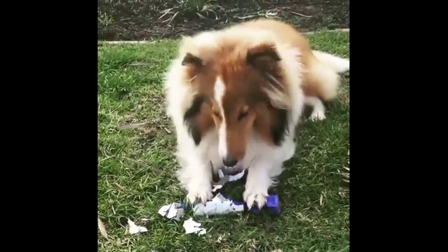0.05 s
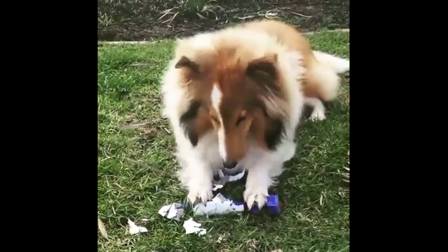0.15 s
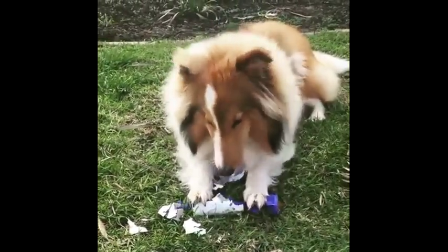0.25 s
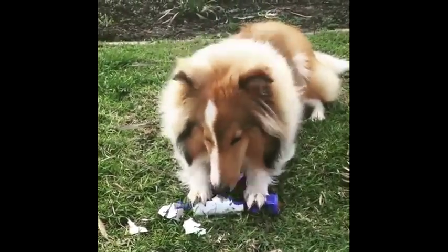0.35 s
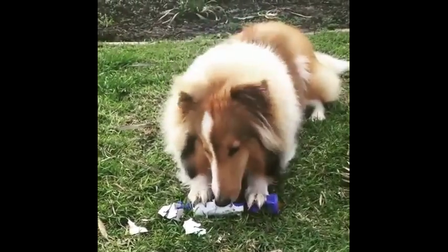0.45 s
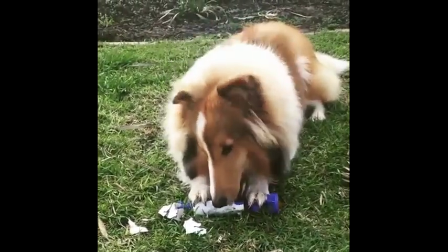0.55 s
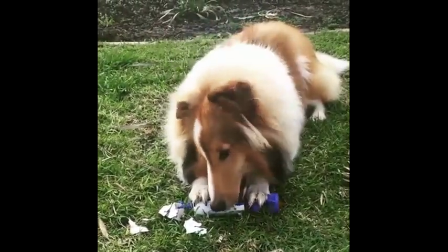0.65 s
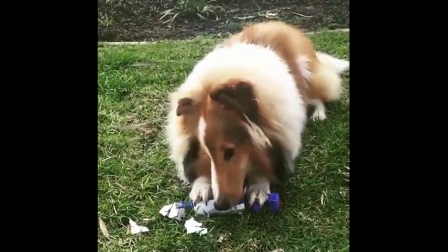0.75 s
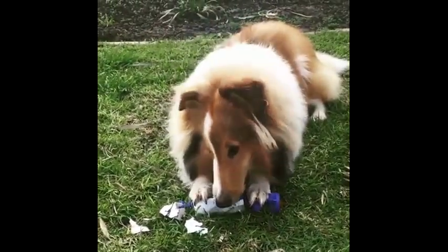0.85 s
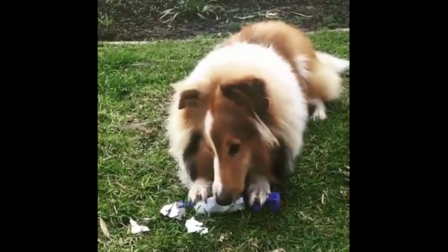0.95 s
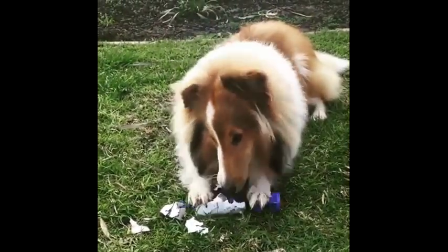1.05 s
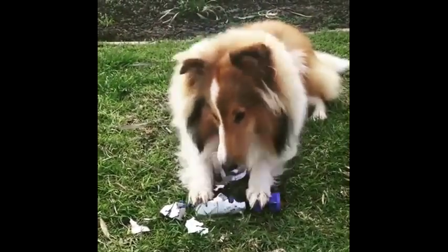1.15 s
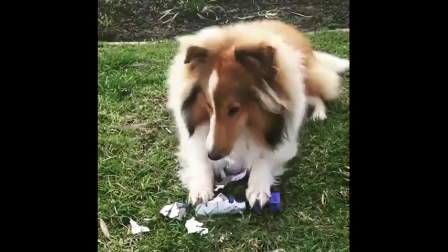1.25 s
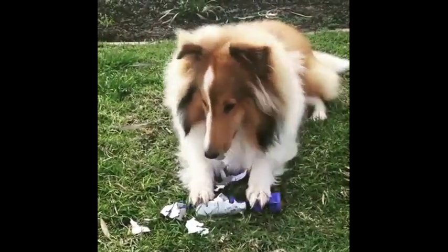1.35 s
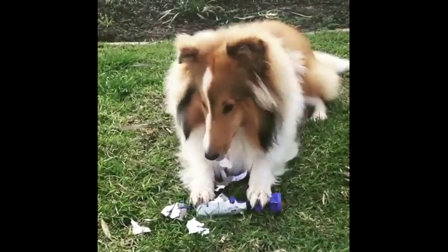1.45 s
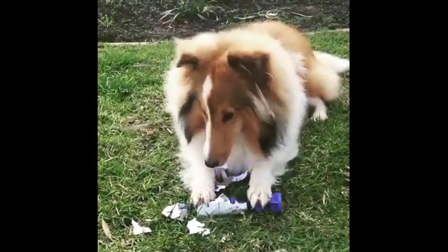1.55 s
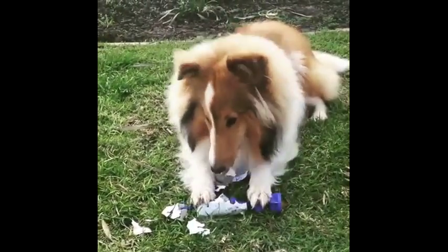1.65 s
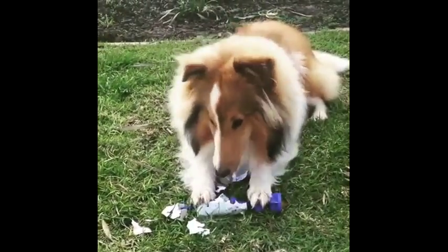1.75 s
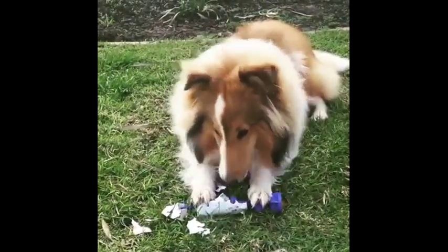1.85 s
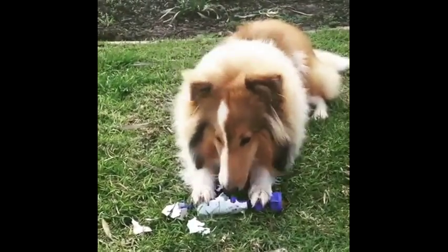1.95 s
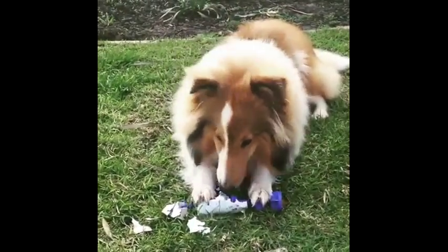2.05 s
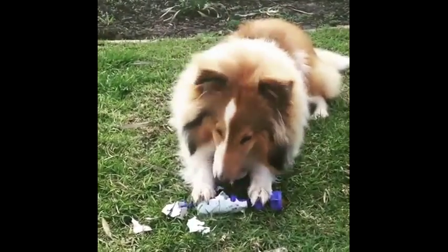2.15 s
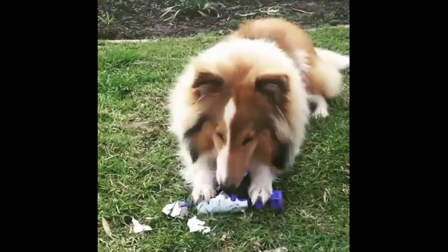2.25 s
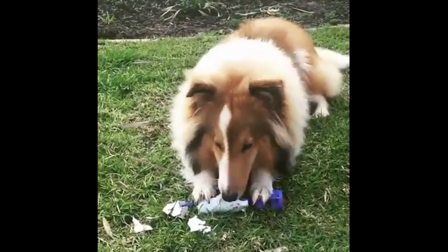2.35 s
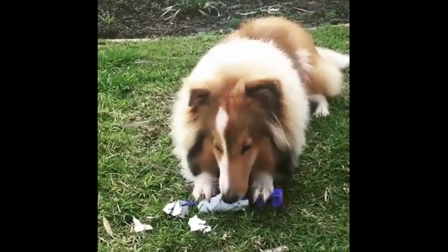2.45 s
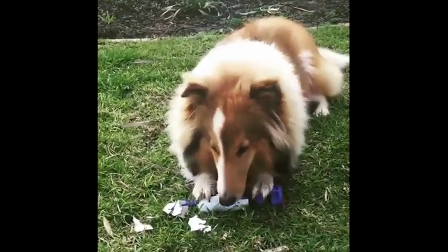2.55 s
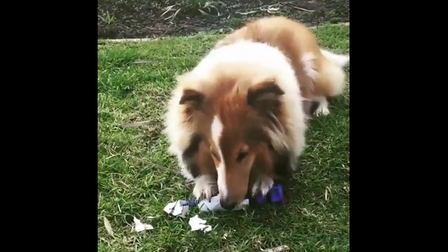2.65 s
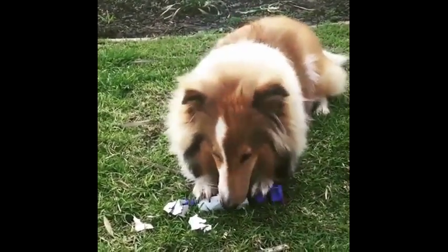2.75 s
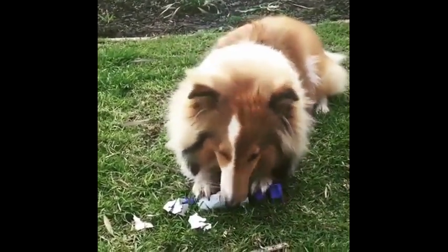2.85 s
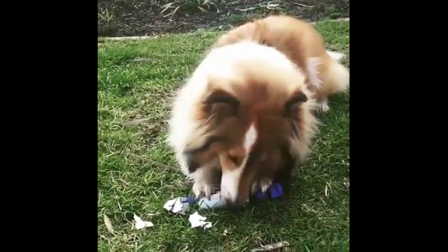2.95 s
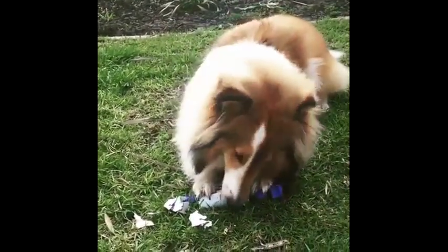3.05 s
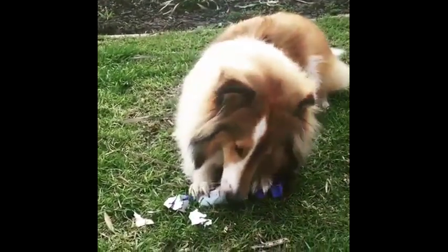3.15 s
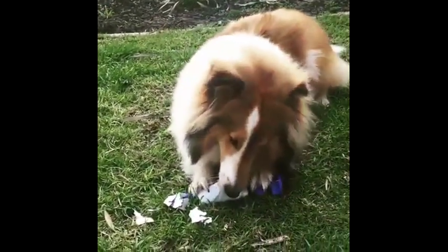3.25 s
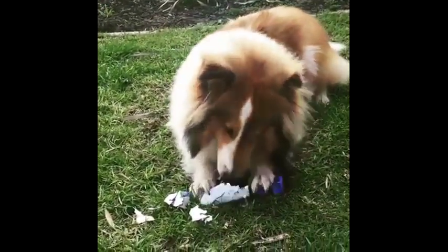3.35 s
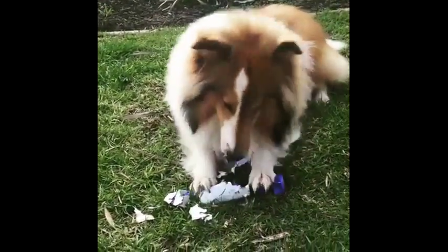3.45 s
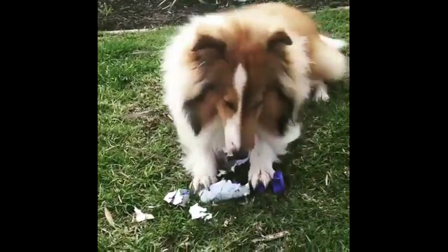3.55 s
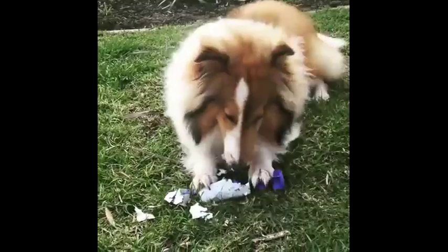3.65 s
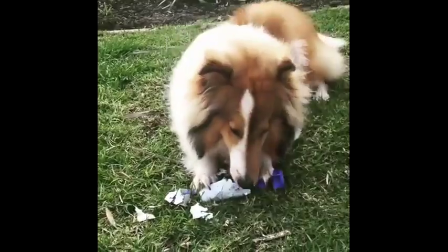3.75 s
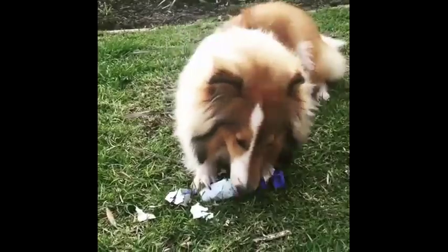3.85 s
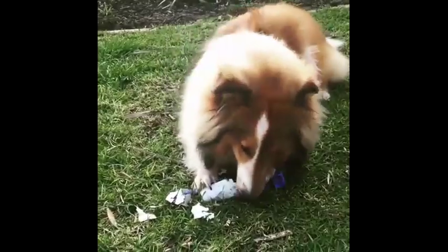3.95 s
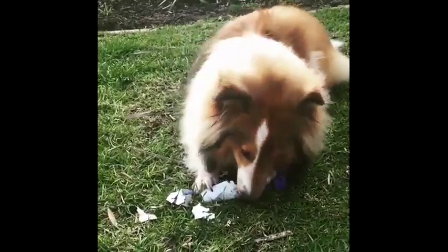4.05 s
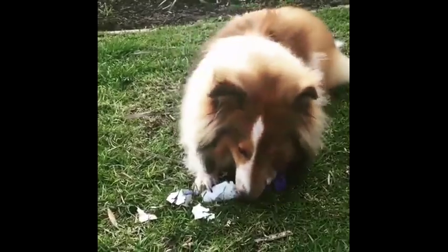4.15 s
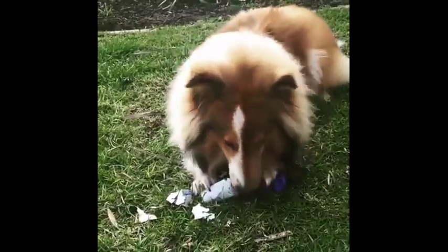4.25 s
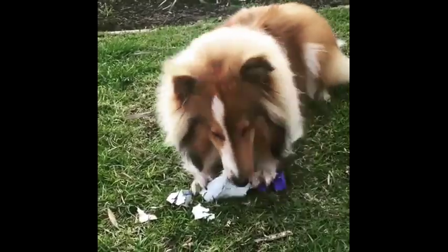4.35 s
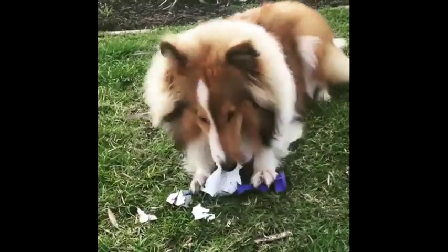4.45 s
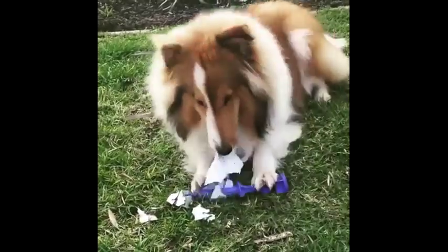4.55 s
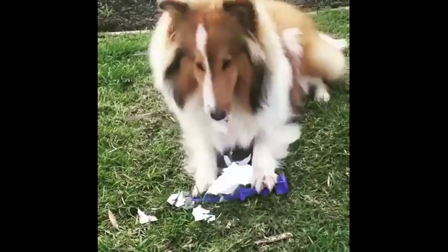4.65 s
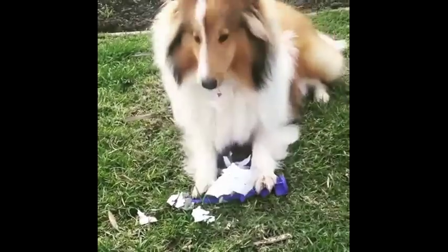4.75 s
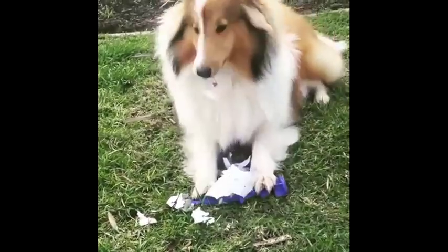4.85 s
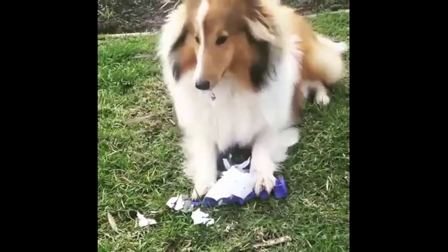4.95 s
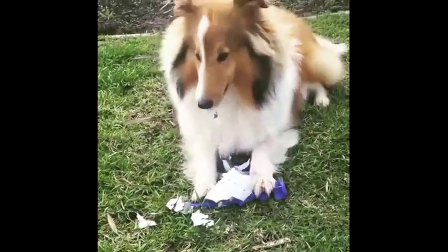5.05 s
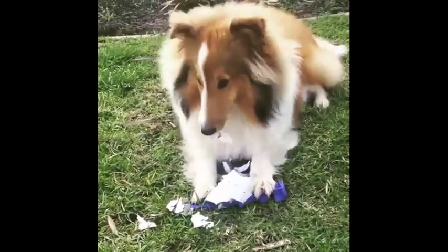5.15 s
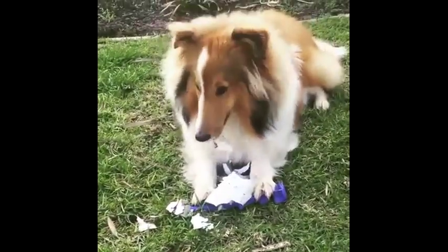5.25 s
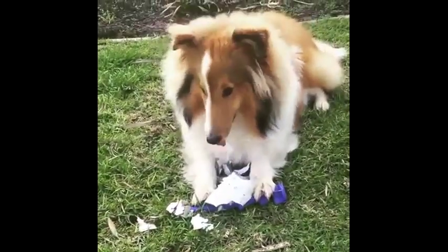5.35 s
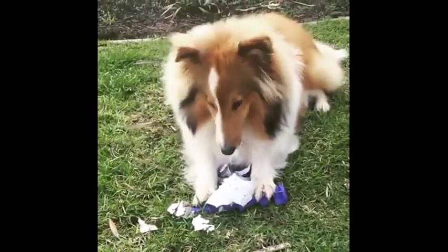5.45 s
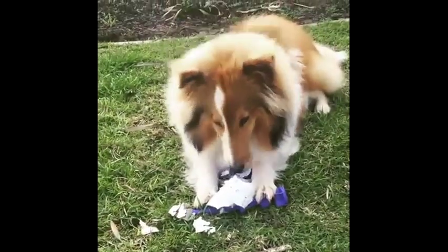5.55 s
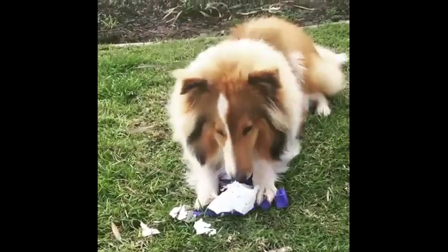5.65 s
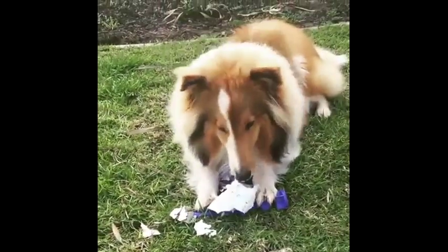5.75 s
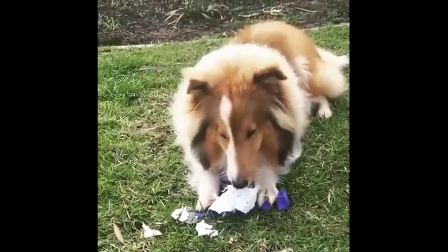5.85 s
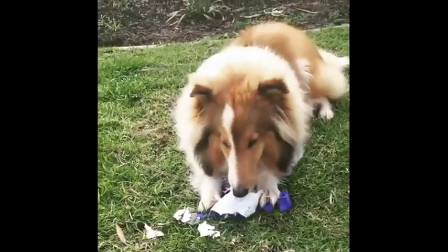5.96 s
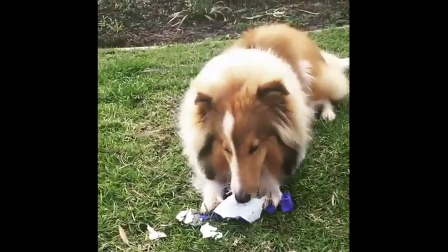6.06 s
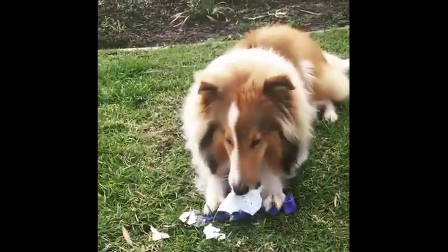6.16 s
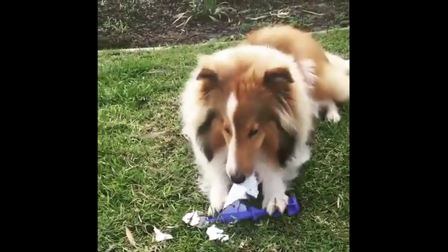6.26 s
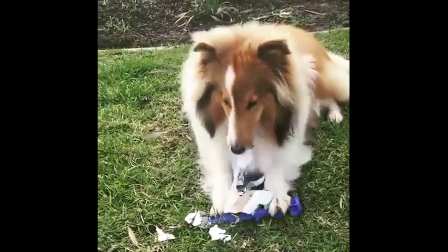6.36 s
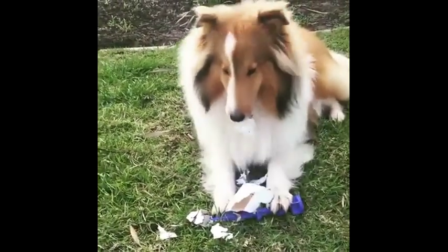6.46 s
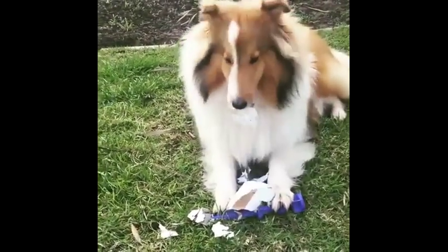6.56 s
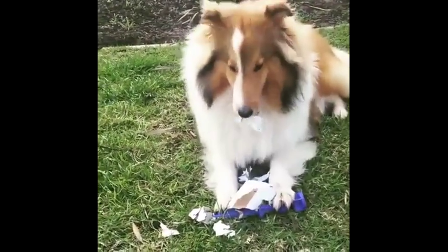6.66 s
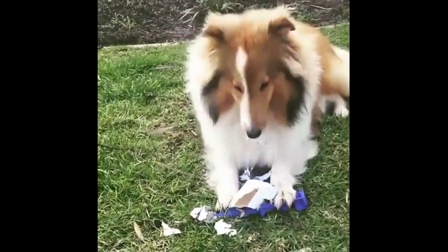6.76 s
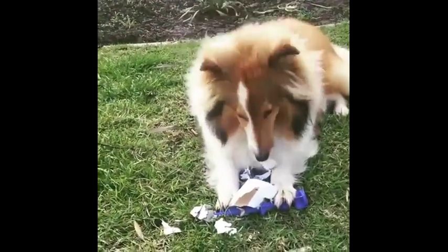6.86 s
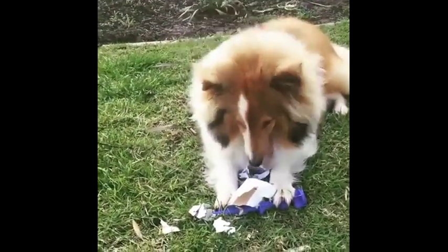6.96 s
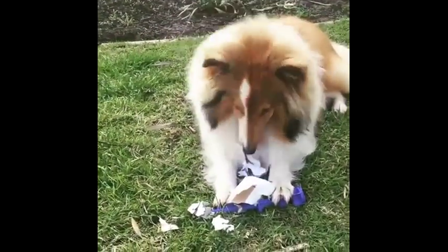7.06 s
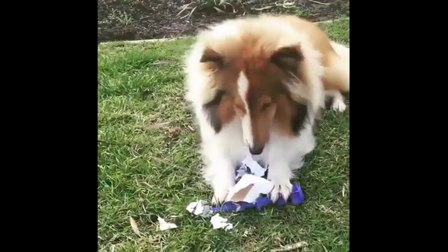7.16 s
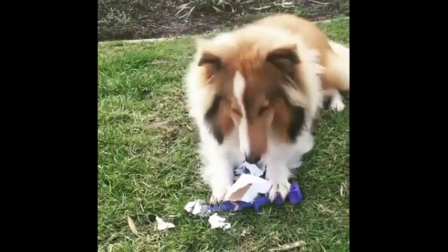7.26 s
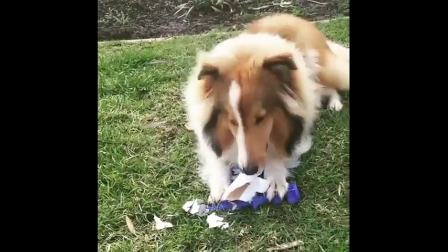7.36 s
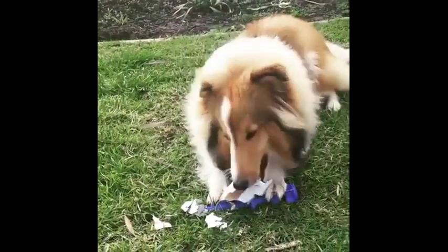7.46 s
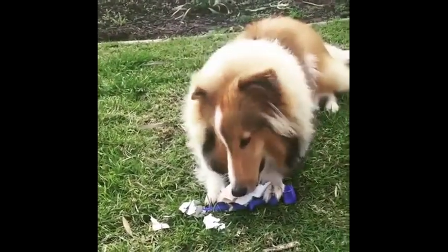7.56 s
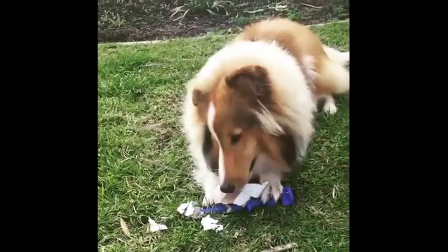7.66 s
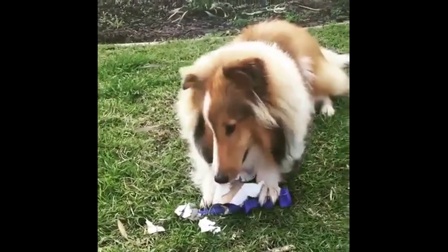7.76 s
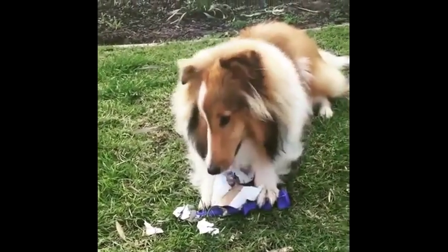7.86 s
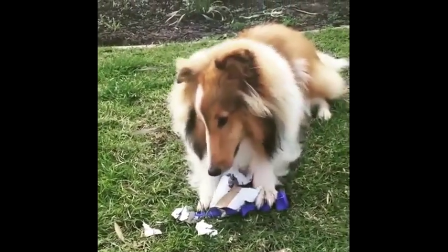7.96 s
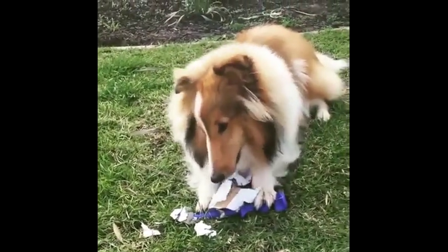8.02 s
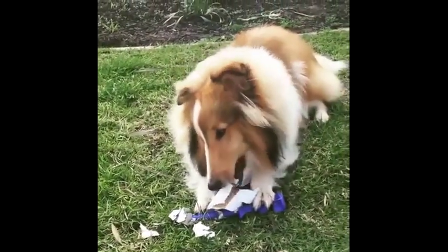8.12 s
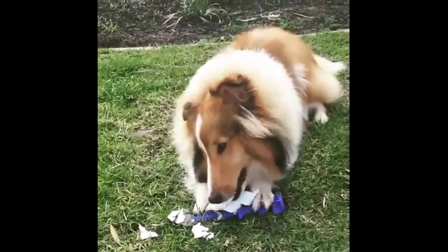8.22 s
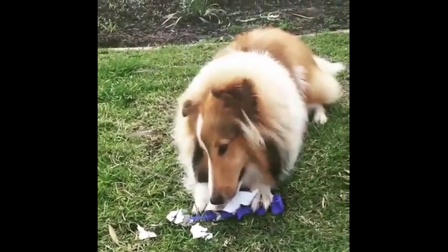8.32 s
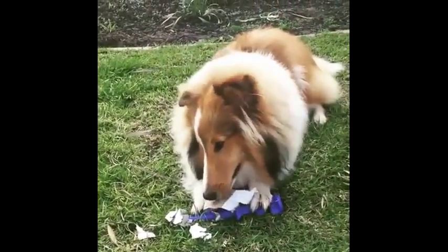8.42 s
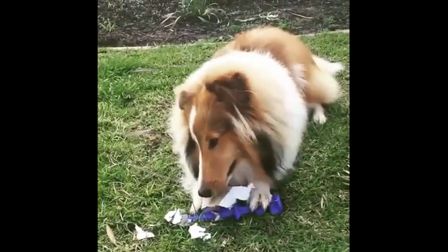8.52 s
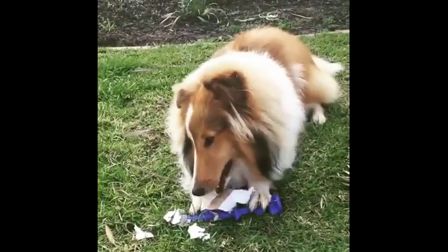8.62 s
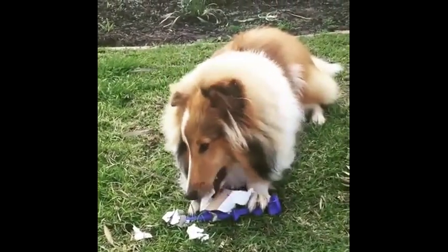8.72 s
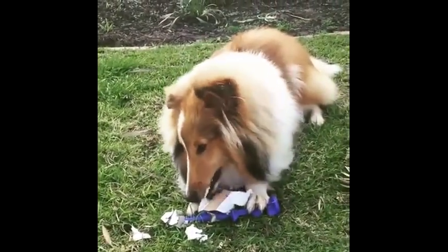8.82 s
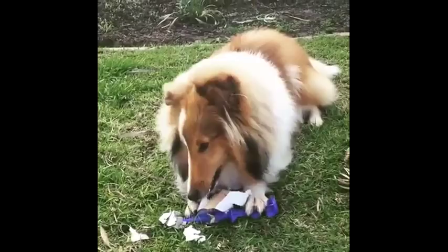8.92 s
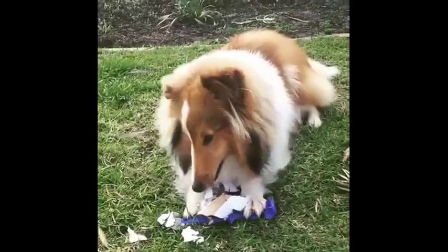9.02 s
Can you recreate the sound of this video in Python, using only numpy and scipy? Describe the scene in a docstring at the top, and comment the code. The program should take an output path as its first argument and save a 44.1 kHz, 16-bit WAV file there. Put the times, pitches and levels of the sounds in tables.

```python
"""Wrapping paper, pulled apart by a dog's teeth on a lawn, two metres from a phone.
Creases flip and ring the sheet; fibres rip in short bursts, one per pull of the jaws.
Far off, a songbird carols in fluty and hoarse notes, echoed by trees and fences.
Background: traffic rumble, soft hiss, a droning motor."""
import sys
import numpy as np
from scipy import signal
from scipy.fft import rfft, irfft, next_fast_len
from scipy.io import wavfile
from scipy.ndimage import uniform_filter1d

SR = 44100
rng = np.random.default_rng(int(sys.argv[2]) if len(sys.argv) > 2 else 0)


def master_out(mix):
    """Clip the mix to full scale and print it as 16-bit PCM to the path in sys.argv[1]."""
    frames = np.transpose(np.atleast_2d(mix))
    ceiling = np.clip(frames, -1, 1)
    pcm = np.round(ceiling * 32767).astype(np.int16)
    wavfile.write(sys.argv[1], SR, pcm)


N = 400816

# crease snaps: t/s, ring f/Hz, ring peak/dB, treble crack peak/dB
CREASE_SNAPS = [(0.0215, 3200, -27, -26), (0.327, 2440, -48, -75), (0.681, 1170, -49, -58),
                (0.683, 2320, -50.5, -51), (2.278, 2730, -43.5, -65), (2.66, 1280, -47.5, -77),
                (2.732, 2700, -52, -51), (2.976, 2200, -35.5, -20), (2.9935, 1700, -33, -32.5),
                (3.311, 2030, -40, -34), (3.339, 1690, -27, -38), (3.524, 1120, -24, -27.5),
                (3.925, 3600, -47, -53), (3.995, 3200, -39, -40), (4.438, 2070, -54, -39),
                (4.538, 1490, -24, -51), (4.592, 925, -42.5, -55), (4.729, 5030, -20.5, -16),
                (4.806, 6250, -25, -25.5), (5.467, 1670, -41, -70), (6.387, 2400, -48, -28),
                (6.902, 5500, -55, -53), (7.908, 3240, -43.5, -43), (7.93, 3480, -45, -51),
                (7.949, 4160, -32.5, -54), (7.956, 730, -53.5, -60), (7.994, 4400, -34, -27.5),
                (8.029, 4660, -38.5, -34), (8.431, 1390, -55, -61), (8.677, 2870, -52, -58),
                (8.722, 3240, -56.5, -66), (8.817, 3200, -48, -52.5), (8.878, 2470, -47, -56),
                (8.887, 2360, -43, -52), (8.899, 3030, -35.5, -55), (8.915, 4700, -38.5, -39)]
# rip envelopes, one list per pull of the jaws: t/s, level/dB
JAW_PULLS = [
    [(0, -50.5), (.012, -60), (.022, -37), (.028, -42), (.034, -57), (.06, -82)],
    [(.9, -76.5), (1.04, -67), (1.072, -60), (1.11, -73.5), (1.155, -56), (1.184, -50), (1.189, -42),
     (1.204, -42.5), (1.21, -58), (1.235, -73)],
    [(2.975, -59), (3.035, -80)],
    [(3.29, -84), (3.33, -69), (3.45, -65.5), (3.51, -75)],
    [(3.51, -62), (3.521, -49.5), (3.526, -36.5), (3.54, -49), (3.545, -64), (3.59, -72)],
    [(4.36, -69), (4.5, -68), (4.525, -53), (4.536, -42), (4.58, -47.5), (4.624, -52.5), (4.65, -44.5),
     (4.705, -54)],
    [(4.705, -48), (4.72, -44.5), (4.727, -33), (4.732, -29), (4.735, -53), (4.748, -50), (4.751, -38),
     (4.756, -38), (4.759, -44), (4.764, -32.5), (4.773, -41.5), (4.783, -42.5), (4.806, -43.5),
     (4.812, -58), (4.85, -64.5)],
    [(6.1, -76), (6.3, -70), (6.35, -60), (6.372, -52.5), (6.378, -68), (6.41, -53)],
    [(6.41, -65), (6.428, -42), (6.446, -47), (6.45, -37.5), (6.482, -37), (6.515, -44.5), (6.558, -52.5),
     (6.568, -72)],
    [(7.73, -73), (7.778, -58), (7.81, -61.5), (7.835, -77)],
    [(7.885, -70), (7.94, -52), (7.95, -43), (7.975, -58), (7.995, -50.5), (8.028, -57), (8.04, -53.5),
     (8.1, -82)],
    [(8.41, -79), (8.43, -57.5), (8.45, -71), (8.465, -64), (8.522, -55), (8.545, -56.5), (8.61, -77.5)],
    [(8.705, -83), (8.73, -66), (8.785, -80), (8.85, -75), (8.9, -75), (8.95, -72.5), (9.09, -70)],
]
# sheet thud, one per pull: level/dB re rip
THUD_GAINS_DB = [5, -3, 8, 0.5, 4.5, -7, -14, -5, -11.5, -24, -11, -33, -7]
# tearing paper spectrum: f/Hz, level/dB
RIP_SPECTRUM = [(1100, -14.5), (2000, -3), (2700, -1.5), (3400, 2), (4900, -1), (6400, 3.5), (8500, -1.5),
                (12000, -0.5), (14000, -16)]
# clear bird notes: t/s, length/s, f/Hz, level/dB
CLEAR_NOTES = [(3.765, 0.091, 791, -66.5), (4.076, 0.082, 1073, -54), (4.14, .11, 1194, -68.5),
               (4.165, 0.1, 1058, -58), (4.29, 0.15, 893, -65), (4.718, 0.11, 754, -53),
               (4.923, 0.044, 1460, -56), (5.164, 0.24, 1569, -54), (5.324, 0.24, 1565, -61.5),
               (5.56, 0.23, 1975, -68.5), (6.09, 0.11, 1197, -62.5), (6.596, 0.29, 2800, -73.5),
               (6.869, 0.145, 1304, -63.5), (7.214, 0.092, 1805, -68.5), (8.01, 0.11, 1170, -64.5),
               (8.131, 0.067, 1531, -61.5), (8.21, 0.1, 1446, -55.5), (8.359, .1, 1401, -64.5),
               (8.348, 0.071, 1297, -62)]
# hoarse bird notes: t/s, length/s, f/Hz, level/dB, throb f/Hz, throb depth/dB
HOARSE_NOTES = [(2.406, 0.16, 1433, -73, 60.5, 7.5), (2.43, 0.1, 2070, -71.5, 70.6, 7),
                (4.267, 0.091, 1036, -54, 70, 4.5), (4.361, .075, 1020, -58, 70, 3.5),
                (4.921, 0.15, 1230, -59, 76, 7), (5.001, 0.64, 2386, -76.5, 119.5, 8.5),
                (5.01, 0.093, 1713, -56.5, 66.3, 7), (5.382, 0.315, 1188, -52.5, 88.2, 4),
                (5.652, 0.11, 709, -60, 82, 4.5), (5.76, 0.4, 1003, -55, 56.2, 8.5),
                (8.198, 0.13, 1354, -66.5, 47.5, 5), (8.928, 0.16, 1640, -65.5, 56, 5.5)]
# traffic spectrum: f/Hz, level/dB
TRAFFIC_SPECTRUM = [(25, -22), (38, -8.5), (79, -2), (194, -17), (239, -21.5), (280, -21.5), (426, -34.5),
                    (615, -29), (1180, -30.5), (1500, -34), (2970, -41.5), (11600, -49), (13200, -56.5)]
# higher motor orders: f/Hz, width/Hz, rms level/dB
MOTOR_ORDERS = [(78, 11, -62.5), (110, 14, -65.5)]


def crease_snaps(rise_s=.0004, decay_s=.0011, knock_db_per_octave=-22.5):
    """A crease flips: the jolt rings the bent sheet, cracks in the treble, knocks the card inside."""
    out, t = np.zeros(N), np.arange(-256, 768) / SR
    falloff = abs(t) / np.where(t < 0, rise_s, decay_s)  # for a 2 kHz fold
    for start_s, hz, ring_db, crack_db in CREASE_SNAPS:
        push = np.exp(-falloff * (hz / 2000) ** .32)  # tighter folds flip faster
        jolt = rng.standard_normal(len(t)) * push
        spread = max(1.367 + .016 * (ring_db + 40), 1.05)  # harder snap, wider band
        ring = band(band(jolt, hz / spread, hz * spread), hz / spread, hz * spread)
        crack = band(band(jolt * push, 5660, 12300), 5660, 12300)
        knock = band(jolt, 226, 764)
        knock_db = ring_db + 3 + knock_db_per_octave * np.log2(hz / 1000)  # wide folds knock harder
        for part, db in (ring, ring_db), (crack, crack_db), (knock, knock_db):
            add(out, start_s + t[0], undb(db) * part / abs(part).max())
    return out


def fibre_rips():
    """Thousands of fibres break per second, in uneven slips; the sheet thuds with them."""
    rip_env, thud_env, t = np.zeros(N), np.zeros(N), np.arange(N) / SR
    for pull, thud_db in zip(JAW_PULLS, THUD_GAINS_DB):
        times_s, db = np.transpose(pull)
        force = undb(np.interp(t, times_s, db, left=-200, right=-200))
        rip_env += force
        thud_env += undb(thud_db) * force
    for start_s, _, ring_db, crack_db in CREASE_SNAPS:  # sheet loads up to each snap, then settles
        crinkle_db = min(max(ring_db, crack_db), -42) - 25
        add(rip_env, start_s - .02, undb(crinkle_db) * swell(.051, rise=.31, edge=3.4))
    fibres = rng.standard_normal(N) * undb(2.6 * rng.exponential(size=N))
    fibres *= undb(2.3 * walk(900))
    # folds differ in stiffness: colour shifts from slip to slip
    rasp = wander_bands(colour(fibres, RIP_SPECTRUM), 1024, lambda hz: 2.5 * walk(450))
    thud = band(fibres, 200, 3000)
    return rip_env * level(rasp, 0) + thud_env * level(thud, 0)


def songbird(sag_above_hz=1250, far_below_db=-62):
    """Near-sine notes; hoarse ones throb as the two sides of the syrinx beat."""
    out, wobble, flicker, jitter = np.zeros(N), walk(60), walk(24.88), walk(250)
    notes = [(*note, 0, 0) for note in CLEAR_NOTES] + list(HOARSE_NOTES)
    for start_s, length_s, mean_hz, db, throb_hz, throb_db in notes:
        arch = swell(length_s, rise=.46, edge=.73)
        i = int(mean_hz * 37) + np.arange(len(arch))  # own stretch of the random curves
        sags = throb_db == 0 and mean_hz > sag_above_hz and db > far_below_db
        glide = np.linspace(1.008, .992, len(arch)) if sags else 1
        # deep throb and far trees blur the pitch
        blur = .000863 * throb_db ** 2 + .0007 * max(far_below_db - db, 0)
        pitch_hz = mean_hz * glide * (1 + .0048 * wobble[i] + blur * jitter[i])
        beat_hz = throb_hz * (1 + .037 * throb_db * wobble[2 * i])
        note_db = db + throb_db * np.cos(phase(beat_hz)) + 2.8 * flicker[i]
        add(out, start_s, undb(note_db) * arch * np.sin(phase(pitch_hz)))
    return out


def traffic(rms_db=-56.5, steadier_above_hz=2350):
    """Rumble and soft hiss, shifting in colour; the treble wanders less."""
    def drift_db(hz):
        return (1.22 * walk(1.48) + 2.57 * walk(9)) * (.4 if hz > steadier_above_hz else 1)

    rumble = level(colour(rng.standard_normal(N), TRAFFIC_SPECTRUM), rms_db)
    return wander_bands(rumble, 16, drift_db)


def motor(tone_hz=52.8, tone_rms_db=-62):
    """Far engine: one steady low tone; the air blurs higher orders into narrow noise."""
    tone = np.sin(phase(tone_hz * (1 + .01 * walk(1.516))))
    out = level(tone * undb(walk(2.7)), tone_rms_db)
    bins_hz = np.arange(N // 2 + 1) * SR / N
    for hz, width_hz, rms_db in MOTOR_ORDERS:
        peak = 1 / (1 + (2 * (bins_hz - hz) / width_hz) ** 2)
        out += level(irfft(rfft(rng.standard_normal(N)) * peak, N), rms_db)
    return out


def undb(db):
    return 10 ** (np.asarray(db) / 20)


def level(x, rms_db):
    return x * undb(rms_db) / np.sqrt(np.mean(x ** 2))


def phase(hz):
    return 2 * np.pi * np.cumsum(hz) / SR


def add(out, start_s, x):
    i = max(int(start_s * SR), 0)
    out[i:i + len(x)] += x[:N - i]


def band(x, lo_hz, hi_hz):
    return signal.sosfilt(signal.butter(2, [lo_hz, hi_hz], "band", fs=SR, output="sos"), x)


def colour(x, points):
    """Filter by a spectrum: f/Hz, level/dB."""
    hz, db = np.transpose(points)
    bins_hz = np.arange(len(x) // 2 + 1) * SR / len(x) + 1
    return irfft(rfft(x) * undb(np.interp(np.log(bins_hz), np.log(hz), db)), len(x))


def walk(rate_hz):
    """Random steps, smoothed twice; spread near 1."""
    hold = int(SR / rate_hz)
    steps = np.repeat(rng.standard_normal(N // hold + 1), hold)
    return 1.2 * uniform_filter1d(uniform_filter1d(steps, hold), hold)[:N]


def swell(length_s, rise, edge):
    """Arch peaking at fraction rise of its length; small edge: flat top, abrupt ends."""
    u = np.arange(int(length_s * SR)) / (length_s * SR)
    return np.sin(np.pi / 2 * np.minimum(u / rise, (1 - u) / (1 - rise))) ** edge


def wander_bands(x, lowest_hz, gain_db):
    """Overlapping bands, half an octave apart, up to 16 kHz; each follows gain_db(centre Hz)."""
    out, size = np.zeros(N), next_fast_len(N, True)
    spectrum = rfft(x, size)
    octaves = np.log2(np.arange(size // 2 + 1) * SR / size + 1)
    for centre in np.arange(np.log2(lowest_hz), 14.2, .5):
        triangle = np.clip(1 - 2 * abs(octaves - centre), 0, 1)
        out += irfft(spectrum * triangle, size)[:N] * undb(gain_db(2 ** centre))
    return out


def with_tail(x, t60_s, tail_db):
    """Sound plus a diffuse, decaying tail."""
    t = np.arange(SR // 2) / SR
    echo = rng.standard_normal(len(t)) * np.exp(-np.log(1000) * t / t60_s)
    echo *= undb(tail_db) / np.sqrt(np.sum(echo ** 2))
    return x + signal.fftconvolve(x, echo)[:N]


def scene():
    """Near paper, far bird, background; mono."""
    paper = crease_snaps() + with_tail(fibre_rips(), t60_s=.14, tail_db=-14)  # loose sheet rustles on
    bird = with_tail(songbird(), t60_s=.55, tail_db=-3.5)  # trees and fences
    return (paper + bird + traffic() + motor())[None]


def record(dry, low_cut_hz=42, high_cut_hz=12500):
    """Phone: drops the deepest bass, cuts the top."""
    dry = signal.sosfilt(signal.butter(4, low_cut_hz, "high", fs=SR, output="sos"), dry)
    return signal.sosfilt(signal.ellip(8, .2, 60, high_cut_hz, fs=SR, output="sos"), dry)


dry = scene()
out = record(dry)
master_out(out)
```